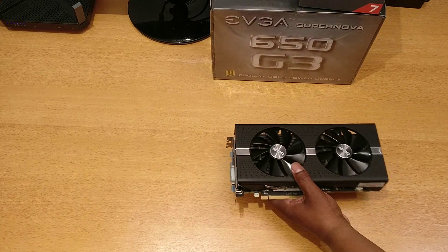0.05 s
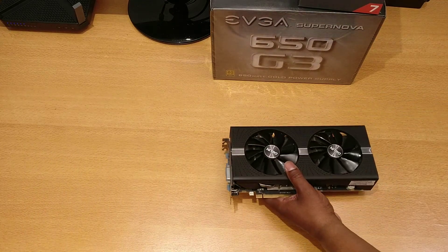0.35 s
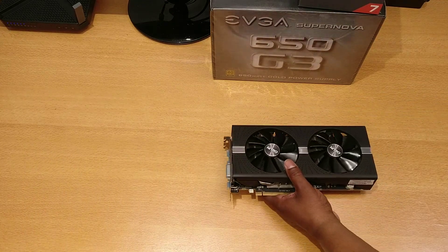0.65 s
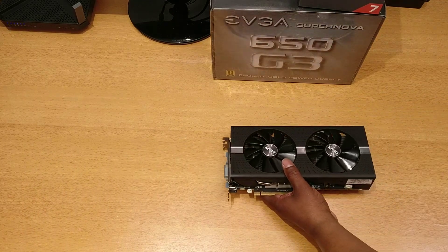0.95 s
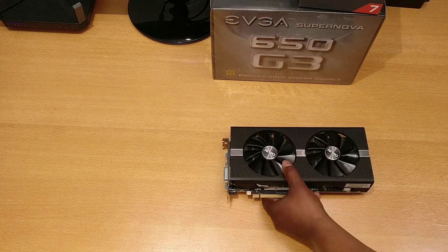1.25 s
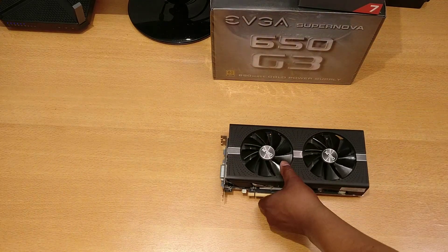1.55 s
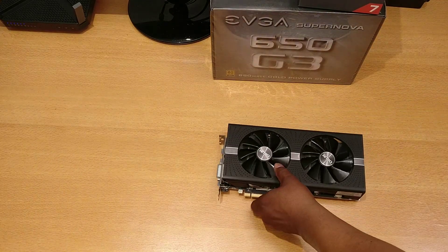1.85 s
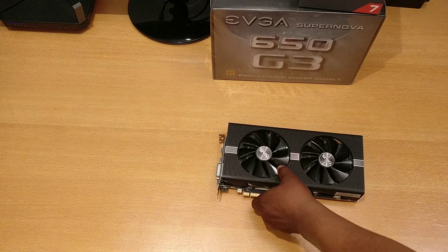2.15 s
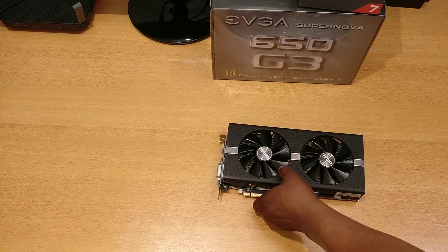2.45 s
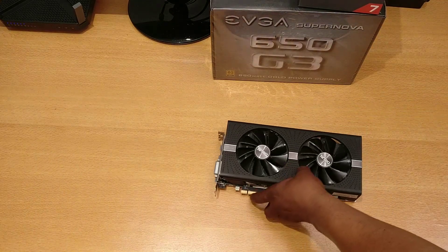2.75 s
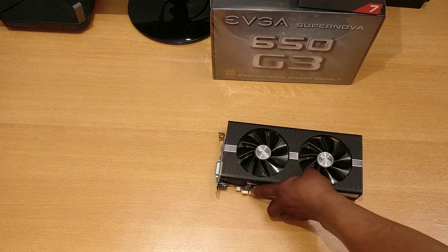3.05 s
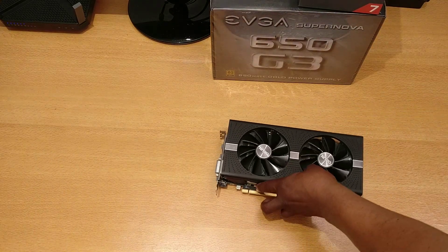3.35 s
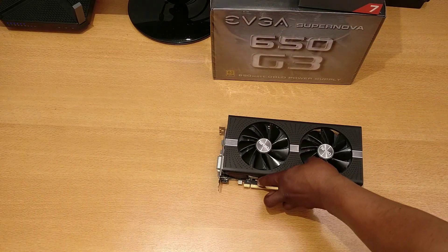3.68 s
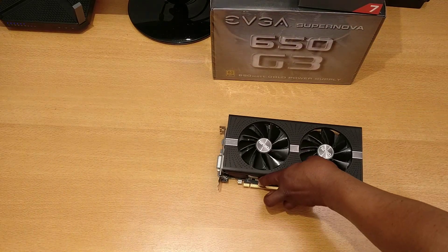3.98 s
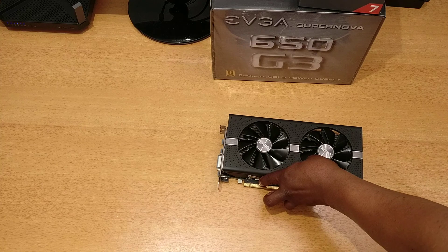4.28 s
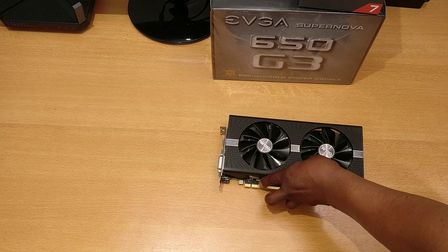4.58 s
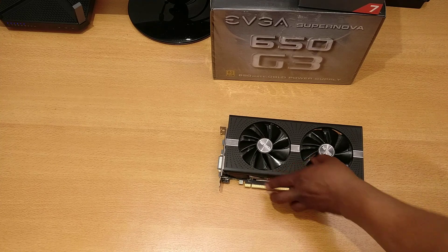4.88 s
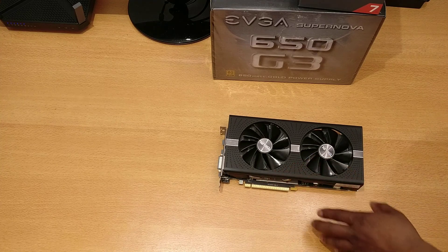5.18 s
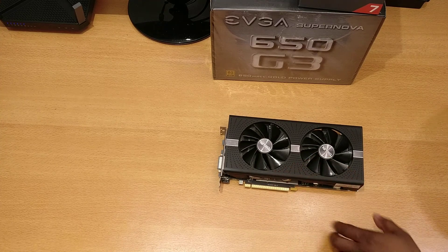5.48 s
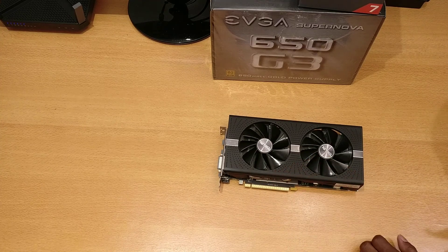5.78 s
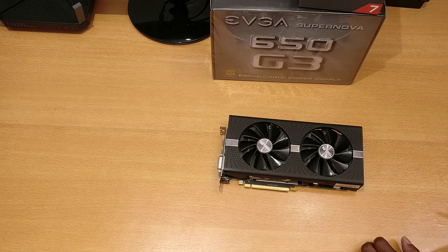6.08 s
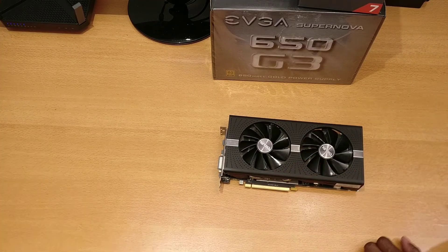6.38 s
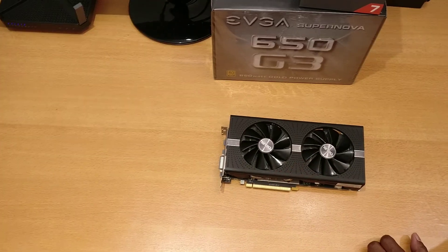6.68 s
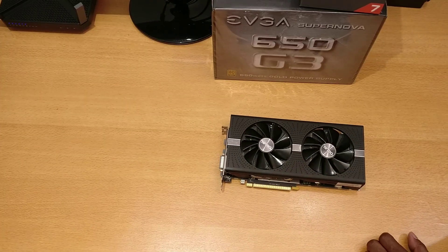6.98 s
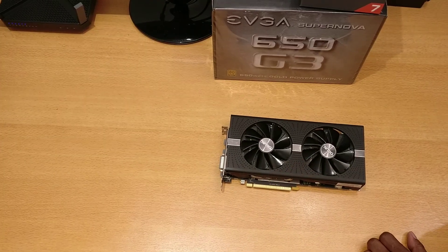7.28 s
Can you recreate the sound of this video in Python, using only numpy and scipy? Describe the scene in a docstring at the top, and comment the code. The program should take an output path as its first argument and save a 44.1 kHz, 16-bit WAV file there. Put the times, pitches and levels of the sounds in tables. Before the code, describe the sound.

A brief rub and a soft knock open the scene. At 0.2 seconds a graphics card lands on a wooden desk, the loudest moment: plastic clatter, ringing metal fins and a low boom. Around 0.5 seconds come a swish, a sharp click and a short judder. From 1 to 1.7 seconds the card is pushed along, scraping quietly with tiny squeaks. Near 2 seconds it tips with a light rattle and bump. A second gritty, squealing push runs from about 3 to 3.5 seconds, followed by faint finger ticks. At 5 seconds fingers rasp off the plastic, then skin and sleeve swish while an arm bumps the desk repeatedly, with hollow thuds and clicks until 6 seconds. Softer rubs and taps fade by 7 seconds. Two spaced microphones capture the bare room's short reverberation over a faint hum and hiss.

```python
"""A bare room with a wooden desk: a graphics card is set down, nudged straight and let go.
Its plastic shroud clatters, its metal fins ring and the desk booms under it. Pushed along, it sticks
and slips on the wood in judders, scrapes and squeaks. Fingers tick and rub on it; then the arm
withdraws and bumps the desk. Two spaced microphones hear mostly the room, over a faint hum."""
import sys
import numpy as np
from scipy import signal
from scipy.fft import rfft, irfft, next_fast_len
from scipy.io import wavfile
from scipy.ndimage import uniform_filter1d, map_coordinates

SR = 44100
rng = np.random.default_rng(int(sys.argv[2]) if len(sys.argv) > 2 else 0)


def waveform_to_disk(signal):
    """Save audio, clipped to [-1, 1], as 16-bit WAV at the path in sys.argv[1]."""
    frames = np.transpose(np.atleast_2d(signal))
    scaled = np.clip(frames, -1, 1) * 32767
    samples = np.round(scaled).astype(np.int16)
    wavfile.write(sys.argv[1], SR, samples)


N = 323076
SPAN = 32768  # samples in a one-shot
TIME, AGE = np.arange(N) / SR, np.arange(SPAN) / SR  # seconds into the scene, into a one-shot

# bending modes of the desk top: pitch_hz, width_hz, gain_db
DESK_MODES = [(145.5, 10, 1.5), (183.4, 4.7, 5), (230.3, 26, 3), (298.4, 30, 3), (483, 25.06, -7.5),
              (950, 300, -19.5)]
# dull swish: frequency_hz, gain_db
SWISH_EQ = [(400, -9.5), (700, -3), (950, -11), (1700, -6.5), (2800, -10.5), (3400, -8), (7000, -20.5),
            (16000, -48.5)]
# rasping resonances of the shroud: pitch_hz, width_hz, gain_db
RASP_MODES = [(980, 110, -1), (1330, 36, -6.5), (1530, 20, -8.5), (1730, 180, -4), (2280, 180, -9),
              (2740, 100, -6)]


def amp(db):
    """Decibels to gain."""
    return 10 ** (np.asarray(db) / 20)


def unit(x):
    """Scale to rms 1."""
    return x / np.sqrt(np.mean(x ** 2) + 1e-20)


def along(points, hz):
    """Read a curve of (frequency_hz, value) points on a log frequency axis."""
    freqs, values = np.transpose(points)
    return np.interp(np.log(hz + 1), np.log(freqs + 1), values)


def fader(points):
    """Smoothed gain per sample from (time_s, level_db) points, silent outside them."""
    times, db = np.transpose(points)
    return uniform_filter1d(amp(np.interp(TIME, times, db, left=-120, right=-120)), size=256)


def wobble(rate, count=N):
    """A smooth random curve, rate knots a second."""
    knots = rng.standard_normal(int(count * rate / SR) + 4)
    return map_coordinates(knots, [TIME[:count] * rate])


def filtered(x, response):
    """Filter x by a gain given as a function of Hz."""
    count = x.shape[-1]
    padded = next_fast_len(count + 8192)
    return irfft(rfft(x, padded) * response(np.fft.rfftfreq(padded, 1 / SR)), padded)[..., :count]


def impulse(colour):
    """The sharpest (minimum-phase) impulse response with this colour, in dB as a function of Hz."""
    cepstrum = irfft(np.log(amp(colour(np.fft.rfftfreq(SPAN, 1 / SR))) + 1e-6))
    cepstrum[1:SPAN // 2] *= 2
    cepstrum[SPAN // 2 + 1:] = 0
    return irfft(np.exp(rfft(cepstrum)))


def through(x, response):
    """Convolve, keeping the length of x."""
    return signal.fftconvolve(np.atleast_2d(x), np.atleast_2d(response), axes=1)[:, :x.shape[-1]]


def resonances(modes, hz):
    """Response of a body with (pitch_hz, width_hz, gain_db) modes of alternating polarity."""
    return sum((-1) ** k * amp(db) * 1j * hz * width / (pitch ** 2 - hz ** 2 + 1j * hz * width)
               for k, (pitch, width, db) in enumerate(modes))


def add(track, start_s, db, sound):
    """Mix in a one-shot, its loudest 20 ms at this rms level."""
    loudest = uniform_filter1d(np.mean(sound ** 2, axis=0), size=882, mode="constant").max()
    start = max(round(start_s * SR), 0)
    track[:, start:start + SPAN] += amp(db) * sound[:, :N - start] / np.sqrt(loudest)


def diffuse(count, spacing_m=0.15):
    """Noise from all directions at two microphones: alike in the bass, unrelated in the treble."""
    def spread(hz):
        coherence = .97 * np.sinc(2 * hz * spacing_m / 343)
        angle = np.arccos(coherence) / 2
        return np.array([np.cos(angle), np.sin(angle)])
    mid, side = filtered(rng.standard_normal((2, count)), spread)
    return np.array([mid + side, mid - side])


def room(wet_db, right_lag_samples=9, early_db=5, early_t60=0.03):
    """Direct sound, left first, then dense echoes off desk and walls and a fresh reverb tail."""
    # reverb time of the bare room: frequency_hz, t60_s
    decay_times = [(80, .33), (250, .37), (1000, .37), (4000, .4), (9000, .33), (15000, .28)]
    hz, t, noise = signal.stft(diffuse(SPAN), SR, nperseg=256)
    fade = amp(-60 * t / along(decay_times, hz)[:, None]) + amp(early_db - 60 * t / early_t60)
    tail = signal.istft(noise * fade, SR, nperseg=256)[1][:, :SPAN] * (1 - np.exp(-AGE / 0.0012))
    response = amp(wet_db) * tail / np.linalg.norm(tail[0])
    response[0, 0] += 1
    response[1, right_lag_samples] += 1
    return response


def background(hiss_db=-62, hum_hz=231):
    """A faint, bass-heavy hiss with a few wavering machine hums."""
    # level ride of the main hum: time_s, level_db
    hum_ride = [(0, -74.5), (3.7, -74.5), (3.95, -65), (4.4, -66.5), (4.8, -71), (6.8, -74), (7.33, -65)]
    # colour of the faint background hiss, with a dip near 8 kHz: frequency_hz, gain_db
    hiss_eq = [(45, -8.5), (80, 2.5), (120, -12.5), (200, -9.5), (260, -12), (350, -21), (520, -20),
               (750, -25.5), (1400, -24.5), (4000, -30.5), (8000, -39), (16000, -33)]
    # constant low drones: pitch_hz, level_db
    drones = [(54, -68), (88, -76), (140, -70.5)]

    def tone(hz):
        phase = 2 * np.pi * hz * TIME + .5 * wobble(30)
        return unit(np.sin(phase) * amp(3.1 * wobble(3.6)))
    hiss = amp(hiss_db) * unit(filtered(diffuse(N), lambda hz: amp(along(hiss_eq, hz))))
    return hiss + fader(hum_ride) * tone(hum_hz) + sum(amp(db) * tone(hz) for hz, db in drones)


def friction(response, rough_db, grain_rate, count=N):
    """Countless tiny slips in clumps, coloured by the rubbed body and heard from all around."""
    return unit(filtered(diffuse(count) * amp(rough_db * wobble(grain_rate, count)), response))


def micro_impacts(rate):
    """Random clicks of random strength, about rate a second."""
    return (rng.random(SPAN) < rate / SR) * rng.standard_normal(SPAN)


def grit(response):
    """Separate little catches of skin and dust, coloured by the rubbed body."""
    return unit(filtered(through(micro_impacts(rate=110), room(wet_db=5)), response))


def swell_and_fade(rise_s, fade_s):
    """An envelope that swells over its rise, then sinks by 20 dB over its fade."""
    swell = np.minimum(AGE / max(rise_s, .001), 1) ** 0.71
    return swell * amp(-20 * (np.maximum(AGE - rise_s, 0) / fade_s) ** 0.9)


def rubs(desk_db=3, pivot_hz=4000, grit_db=-4, hiss_db=-2):
    """An opening hiss dies away; then skin and sleeve hiss and catch on plastic and stir the desk top."""
    # a hiss already dying away at the start, then the rubs:
    # start_s, level_db, rise_s, fade_s, tilt_db_per_octave
    cues = [(0, -39, 0.00086, 0.16, -2), (.062, -43, 0.015, 0.16, -5.5), (0.385, -38.5, 0.058, 0.16, -0.5),
            (.535, -50.5, 0.038, 0.36, -2.5), (0.802, -61.5, 0.19, 0.26, 1.5),
            (0.969, -53, 0.11, 0.18, 2.5), (1.099, -47.5, 0.089, 0.16, 2), (1.291, -48.5, 0.16, 0.12, 2),
            (2.04, -58, 0.053, 0.61, -.5), (2.3, -61.5, 0.06, 0.78, -0.5), (2.501, -62, 0.089, 0.15, -3.5),
            (2.941, -67.5, 0.097, 0.46, -2), (3.18, -54.5, 0.18, 0.25, -5.5), (4.919, -43, 0.13, 0.81, 1),
            (5.16, -32.5, 0.091, 0.13, 0.3), (5.43, -35, 0.017, 0.22, -1), (5.758, -43, 0.059, 0.36, 1.2),
            (5.98, -44.5, 0.044, 0.073, 2.5), (6.15, -60, 0.1, 0.61, -6.5), (6.47, -51.5, 0.04, 0.16, 3),
            (6.675, -57, 0.093, 0.15, 3), (6.789, -57.5, 0.053, 0.079, 1)]
    # colour of the hiss: frequency_hz, gain_db
    hiss_eq = [(300, -10), (600, -7.5), (1000, -5.5), (2200, -1.5), (4500, -4.5), (7000, -7.5), (10000, -9),
               (16000, -9)]
    out = np.zeros((2, N))
    for start_s, db, rise_s, fade_s, tilt in cues:
        def colour(hz):
            tilted = amp(along(hiss_eq, hz) + tilt * np.log2((hz + 500) / pivot_hz))
            return tilted + amp(desk_db) * resonances(DESK_MODES, hz)
        hiss = amp(hiss_db) * friction(colour, rough_db=0.5, grain_rate=270, count=SPAN)
        add(out, start_s, db, swell_and_fade(rise_s, fade_s) * (hiss + amp(grit_db) * grit(colour)))
    return out


def swish_colour(hz, swish_db, rasp_db):
    """Gain at each frequency of a broad swish plus the shroud's rasp."""
    return amp(along(SWISH_EQ, hz) + swish_db) + amp(rasp_db) * np.abs(resonances(RASP_MODES, hz))


def brushes():
    """An opening swish dies away; then the flat of the hand swishes dully and rasps in the shroud."""
    # a dull swish already dying away at the start, then the brushes: start_s, level_db, rise_s, fade_s
    cues = [(0, -50.5, 0.001, 0.18), (0.064, -40, 0.017, 0.11), (.37, -52, 0.065, 0.11),
            (.53, -58, 0.11, 0.05), (4.221, -60, 0.057, 0.36), (4.37, -65, 0.053, 0.36),
            (5.056, -34, 0.036, 0.058), (5.22, -41.5, 0.025, 0.91), (6.166, -67, 0.11, 0.14)]
    out = np.zeros((2, N))
    colour = lambda hz: swish_colour(hz, swish_db=-4, rasp_db=3)
    for start_s, db, rise_s, fade_s in cues:
        swish = friction(colour, rough_db=3, grain_rate=200, count=SPAN)
        add(out, start_s, db, swell_and_fade(rise_s, fade_s) * swish)
    return out


def contacts(rise_s, length_s, rate, wet_db, touch=0):
    """A sharp first touch, if any, then a swelling and fading flurry of micro-impacts, in the room."""
    hits = micro_impacts(rate)
    hits[round(rise_s * SR / 2)] = 1  # never an empty flurry
    swell = 1 - np.exp(-AGE / max(rise_s, .0002))
    fade = np.exp(-(AGE / max(length_s, .001)) ** 2)
    return through(touch * (AGE == 0) + hits * swell * fade, room(wet_db))


def desk_ring(wet_db, tilt_db_per_octave=0):
    """One blow rings the desk top's bending modes."""
    tilt = lambda hz: amp(tilt_db_per_octave * np.log2(np.clip(hz, 100, 320) / 320))
    return filtered(room(wet_db), lambda hz: resonances(DESK_MODES, hz) * tilt(hz))


def desk_thud(wet_db):
    """One blow shakes the whole desk."""
    # low end of the desk: frequency_hz, gain_db
    thud_eq = [(25, -17.5), (40, -2), (55, 9), (85, 8), (125, -17.5), (250, -47)]
    return through(room(wet_db), impulse(lambda hz: along(thud_eq, hz)))


def bumps(middling_db=-44, middling_s=0.047, bass_cut_db=5, treble_cut_db=8):
    """Each bump shakes the desk, rings its top and clacks where it hits; flesh rounds off the treble."""
    # blunt bumps on the desk: start_s, ring_db, thud_offset_db, clack_offset_db, clack_centre_hz
    cues = [(0.065, -42, -26, -11, 613), (0.531, -45.5, 1, -0.5, 2120), (0.574, -47.5, -6, -15, 520),
            (1.989, -49.5, 3.5, -4.5, 1800), (2.024, -40.5, -9, -8.5, 473), (2.098, -54, 0, -7.5, 460),
            (3.803, -61, -13.5, 2, 730), (4.439, -55, -3.5, -6.5, 1530), (4.919, -43.5, -2, -1, 762),
            (5.195, -34.5, -2, -6, 440), (5.232, -30, -4, -9, 430), (5.272, -40.5, 4.5, -7, 430),
            (5.446, -29.5, -3.5, -4, 720), (5.501, -40, -6, -5, 560), (5.616, -45.5, -1.5, -30, 490),
            (5.876, -38.5, -9, 1.5, 1290), (5.888, -43, -3, 3, 970), (5.981, -42.5, -3.5, -18, 756),
            (6.012, -48, -28, -7.5, 696), (6.306, -56, 5, -15, 460), (6.446, -55, 4, -22, 555),
            (6.757, -55.5, -1.5, -17, 471)]
    out = np.zeros((2, N))
    for start_s, db, thud_db, clack_db, centre_hz in cues:
        length_s = middling_s * amp(0.091 * (db - middling_db))  # harder bumps press for longer
        cut_db = lambda hz: np.where(hz < centre_hz, bass_cut_db, treble_cut_db)
        clack = impulse(lambda hz: -cut_db(hz) * np.log2((hz + 50) / centre_hz) ** 2)
        force = contacts(.002, length_s, rate=900, wet_db=7, touch=1.2)
        tilt = -0.24 * thud_db  # less thud, brighter ring
        add(out, start_s, db, desk_ring(wet_db=6.5, tilt_db_per_octave=tilt))
        add(out, start_s, db + thud_db, desk_thud(wet_db=3))
        add(out, start_s, db + clack_db, through(force, clack))
    return out


def knocks():
    """One blow sets a hollow panel of desk or shroud ringing as the card comes down."""
    # panel knocks: start_s, level_db, pitch_hz, t60_s
    cues = [(0.078, -37, 299.5, 0.28), (0.206, -26, 1000, .025), (0.209, -25.5, 1765, 0.12),
            (0.258, -35, 1220, .03), (0.263, -38, 488, .2)]
    out = np.zeros((2, N))
    for start_s, db, hz, t60 in cues:
        ring = np.sin(2 * np.pi * hz * AGE) * amp(-60 * AGE / t60)
        add(out, start_s, db, through(ring, room(wet_db=-3)))
    return out


def fins(t60=0.23, attack_s=.003):
    """The metal fins ring on, each mode with its own strength and phase at the two microphones."""
    # ringing modes of the card: pitch_hz, gain_db
    modes = [(990, -1.5), (1036, -2), (1586, -3), (2210, -3), (2368, -4), (2498, -3), (3042, -4),
             (3187, -4), (3630, -4), (3849, -2.5), (4757, -2.5), (4840, -4), (5099, -4.5), (5373, -6),
             (6944, -9), (11472, -9), (12110, -9), (13162, -10), (14340, -12)]
    ring = np.zeros((2, SPAN))
    for hz, db in modes:
        gain = amp(db + rng.normal(0, 1.5, (2, 1)))
        ring += gain * np.sin(2 * np.pi * (hz * AGE + rng.random((2, 1))))
    return ring * amp(-60 * AGE / t60) * (1 - np.exp(-AGE / attack_s))


def landings(thud_db=-9, ring_db=-10):
    """The shroud rattles and the fins ring as the card meets the wood, and the desk booms under it."""
    # the card lands or tips: start_s, clatter_db, boom_db, rise_s, rattle_s, first_touch_gain
    cues = [(0.198, -32, -61.5, 0.006, 0.0099, 0.036), (0.2072, -19.5, -32, 0.001, 0.014, 1.5),
            (0.217, -22.5, -38, .001, .014, 1.5), (0.227, -26, -40, 0.002, 0.017, 1.2),
            (0.256, -28.5, -34.5, 0.0029, .012, 0.8), (1.921, -39.5, -61, 0.023, 0.015, 0.049),
            (1.936, -39, -51, 0.0027, 0.0087, 0.91)]
    # clatter of shroud and fins: frequency_hz, gain_db
    clatter_eq = [(200, -34), (350, -14.5), (500, -18.5), (650, -9.5), (1000, -7), (1300, 0.5), (1700, -1),
                  (2200, -6), (2700, -7.5), (4900, -8), (6800, -10), (10000, -14), (16000, -14.5)]
    out = np.zeros((2, N))
    shell = unit(impulse(lambda hz: along(clatter_eq, hz)))
    for start_s, db, boom_db, rise_s, rattle_s, touch in cues:
        force = contacts(rise_s, rattle_s, rate=1300, wet_db=7, touch=touch)
        add(out, start_s, db, through(force, shell))
        add(out, start_s, db + ring_db, fins())
        add(out, start_s, boom_db, desk_ring(wet_db=3))
        add(out, start_s, boom_db + thud_db, desk_thud(wet_db=6))
    return out


def ticks(bass_db_per_octave=7, treble_db_per_octave=6, ring_db=4, ring_octaves=.12):
    """Nails and loose parts snap in a tight crunch that rings at its centre and rolls off either side."""
    # small sharp contacts of fingers and card: start_s, level_db, centre_hz, length_s
    cues = [(0.206, -25.5, 13000, 0.0091), (0.5314, -32, 6100, 0.0021), (0.572, -39.5, 4180, 0.01),
            (0.606, -47, 4430, 0.0046), (0.626, -50, 3660, 0.0055), (1.372, -48, 14100, 0.0093),
            (1.582, -57.5, 13800, 0.013), (2.679, -62.5, 3200, 0.0036), (3.801, -69, 3250, .004),
            (4.255, -54, 5180, 0.0079), (4.438, -62.5, 2400, 0.002), (4.915, -52, 2900, 0.0054),
            (5.383, -42.5, 3080, 0.012), (5.767, -44.5, 4600, 0.01), (5.8182, -38.5, 3640, 0.0055),
            (6.322, -58.5, 13200, 0.0033), (6.499, -62, 12000, 0.0055)]
    out = np.zeros((2, N))
    for start_s, db, centre_hz, length_s in cues:
        def snap(hz):
            octaves = np.log2((hz + 50) / centre_hz)
            peak_db = ring_db * np.exp(-(octaves / ring_octaves) ** 2)
            return peak_db + np.minimum(bass_db_per_octave * octaves, -treble_db_per_octave * octaves)
        force = contacts(0.33 * length_s, length_s, rate=10000, wet_db=2.5)
        add(out, start_s, db, through(force, impulse(snap)))
    return out


def stick_slip(hz, waver, waver_rate, uneven_db, count=N):
    """A surface grips and lets go once a cycle: a tone of unsteady pitch and strength."""
    cycles = np.cumsum(hz * (1 + waver * wobble(waver_rate, count))) / SR
    return unit(np.sin(2 * np.pi * cycles) * amp(uneven_db * wobble(waver_rate, count)))


def judder(start_s=0.555, hold_s=0.13, db=-47.5):
    """The card sticks and slips on the wood ever harder until it stops and the desk rings out."""
    age = TIME - start_s
    until_stop, since_stop = np.maximum(hold_s - age, 0), np.maximum(age - hold_s, 0)
    shudder = amp(-25 * until_stop - 600 * since_stop)  # swell and release in dB per second
    ring = amp(-13 - 78 * since_stop)
    attack = np.clip(age / 0.0064, 0, 1)
    slips = stick_slip(hz=218, waver=0.051, waver_rate=73, uneven_db=2.5)
    return attack * amp(db) * (shudder + ring) * slips


def pushes():
    """Pushed straight in two goes, the card's edge scrapes and squeals while grit grinds under it."""
    # level ride of each push, a list of points: time_s, level_db
    rides = [
        [(0.95, -91), (1.028, -66), (1.21, -57.5), (1.372, -60.5), (1.392, -56.5), (1.484, -54.5),
         (1.596, -66.5), (1.72, -75.5)],
        [(2.88, -84), (2.99, -59.5), (3.05, -58), (3.095, -68), (3.15, -59), (3.21, -60.5), (3.31, -47),
         (3.465, -56), (3.524, -75), (3.58, -82.5)],
    ]
    # balance of each push: scrape_db, grind_db, squeal_db
    mixes = [(-6, -0.5, -22), (-1, -16, -7)]
    # resonances of the dragged card's shroud: pitch_hz, width_hz, gain_db
    shroud_modes = [(539, 14, -10), (695, 27, -6), (890, 30, -21.5), (1189, 33, -5), (1322, 23, 0),
                    (1485, 72, -6), (2090, 65, -14.5), (2290, 160, -14.5), (3843, 320, -24.5)]
    # grinding between card and desk: pitch_hz, width_hz, gain_db
    grind_modes = [(242, 73, -6), (520, 24, -4.5), (930, 87, -3.5), (1860, 120, -10.5), (2400, 280, -15),
                   (2910, 270, -17)]
    shroud = lambda hz: resonances(shroud_modes, hz) / np.sqrt(1 + (hz / 6000) ** 2)
    scrape = friction(shroud, rough_db=1, grain_rate=82)
    grind = friction(lambda hz: resonances(grind_modes, hz), rough_db=0.5, grain_rate=110)
    slips = stick_slip(hz=1325, waver=.045, waver_rate=230, uneven_db=4)
    squeal = unit(through(slips, room(wet_db=-3)))
    return sum(fader(ride) * (amp(scrape_db) * scrape + amp(grind_db) * grind + amp(squeal_db) * squeal)
               for ride, (scrape_db, grind_db, squeal_db) in zip(rides, mixes))


def squeaks():
    """The slips lock onto one mode of the shroud, which sings, swelling and sinking."""
    # the dragged card catches: start_s, level_db, pitch_hz, length_s, pitch_waver_share
    cues = [(1.013, -64, 972, 0.045, 0.013), (1.06, -63, 965, 0.06, .015),
            (1.153, -47.5, 1426, 0.043, 0.062), (1.371, -56, 961, 0.034, 0.029),
            (1.416, -51.5, 1323, 0.036, 0.016), (1.446, -54, 1237, 0.031, 0.066),
            (1.505, -48.5, 1305, 0.014, 0.035), (1.623, -61, 1413, 0.066, .02),
            (2.54, -58.5, 1440, 0.071, 0.011), (5.355, -46, 1036, 0.047, 0.065)]
    out = np.zeros((2, N))
    for start_s, db, hz, length_s, waver in cues:
        arch = np.sin(np.pi * np.minimum(AGE / length_s, 1))
        tone = stick_slip(hz, waver, waver_rate=268, uneven_db=4, count=SPAN)
        add(out, start_s, db, through(arch * tone, room(wet_db=-3)))
    return out


def finger_scrapes():
    """The fingers drag off in jerks, each a gritty run of slips that rasps in the shroud."""
    # jerks of the fingers: start_s, level_db, length_s
    cues = [(5.058, -37, 0.0063), (5.076, -34, 0.011), (5.097, -30.5, 0.0065), (5.117, -39, 0.011)]
    out = np.zeros((2, N))
    shroud = impulse(lambda hz: 20 * np.log10(swish_colour(hz, swish_db=-9, rasp_db=0)))
    for start_s, db, length_s in cues:
        force = contacts(0.00157, length_s, rate=1500, wet_db=5, touch=0.94)
        add(out, start_s, db, through(force, shroud))
    return out


def scene():
    """Impacts, hand noise and the sliding card over faint hiss and hum, in stereo."""
    impacts = landings() + knocks() + ticks() + bumps()
    handling = rubs() + brushes() + finger_scrapes()
    sliding = pushes() + judder() + squeaks()
    return impacts + handling + sliding + background()


def record(dry, top_hz=16000):
    """The microphones cut the deep bass and the very top, notch the treble and differ a little."""
    # colour of both microphones: frequency_hz, gain_db
    mic_eq = [(22, -31.5), (32, -19), (46, 0.5), (6600, 2.5), (7400, -2), (9500, 0), (13000, 2.5),
              (15500, 3)]
    # stereo lean: frequency_hz, left_minus_right_db
    lean = [(200, 0.9), (700, 0.25), (2000, -0.7), (5000, 1.5), (7000, 6.5), (9000, -5), (12000, -6),
            (15000, 1)]
    coloured = through(dry, impulse(lambda hz: along(mic_eq, hz)))
    balance = lambda hz: amp(np.outer([.5, -.5], along(lean, hz)))
    high_cut = lambda hz: np.clip((top_hz - hz) / 400 + .5, 0, 1)
    return filtered(coloured, lambda hz: balance(hz) * high_cut(hz))


dry = scene()
out = record(dry)
waveform_to_disk(out)
```